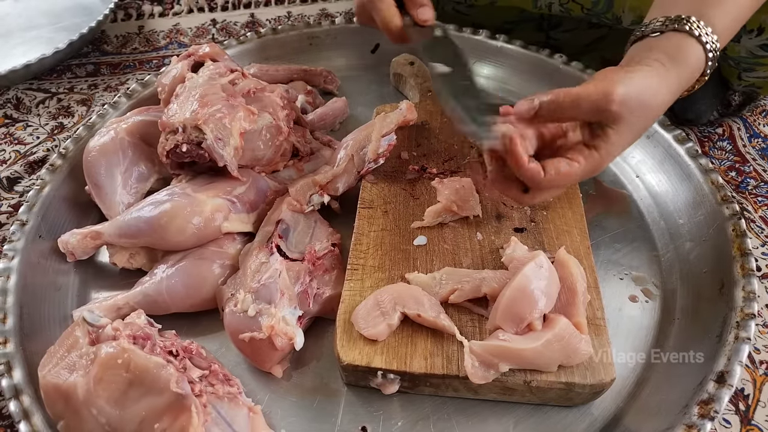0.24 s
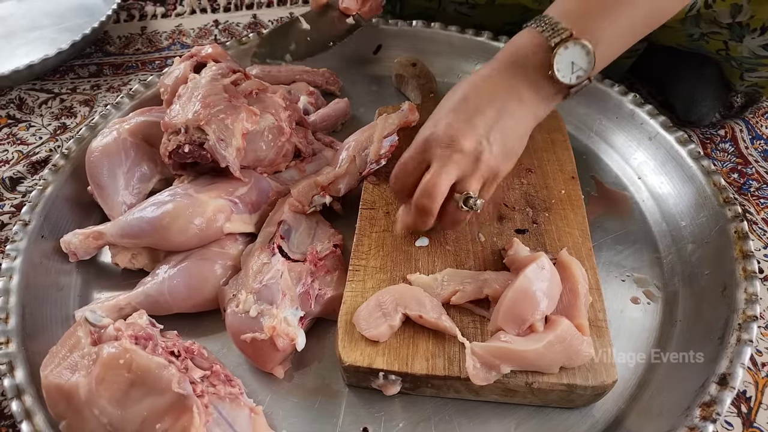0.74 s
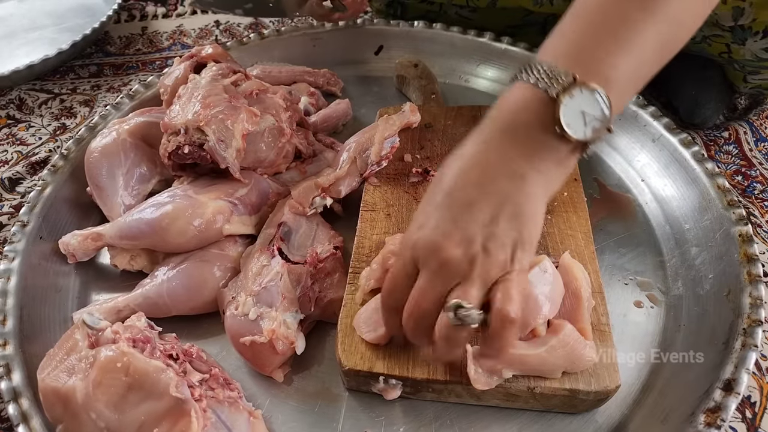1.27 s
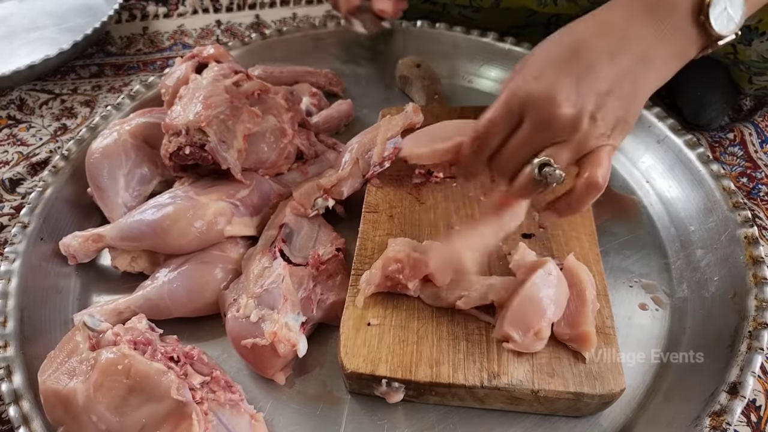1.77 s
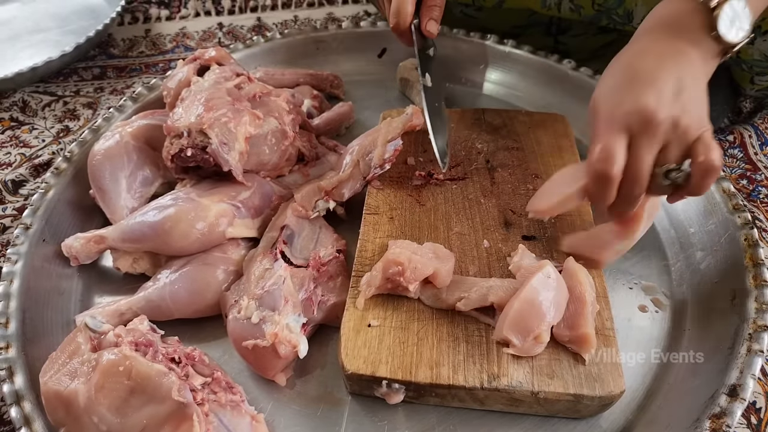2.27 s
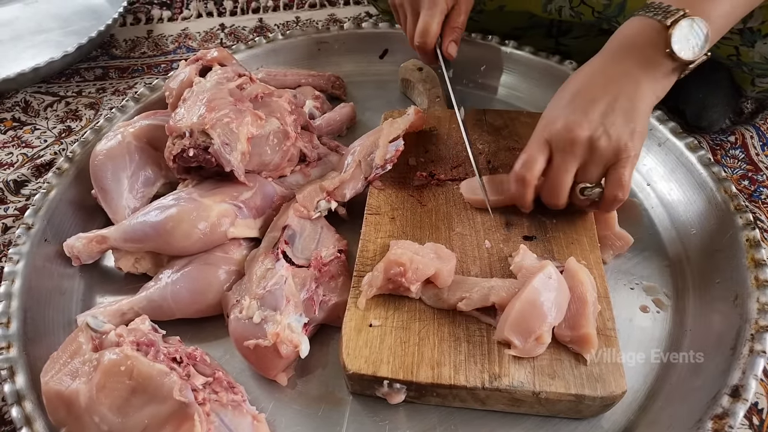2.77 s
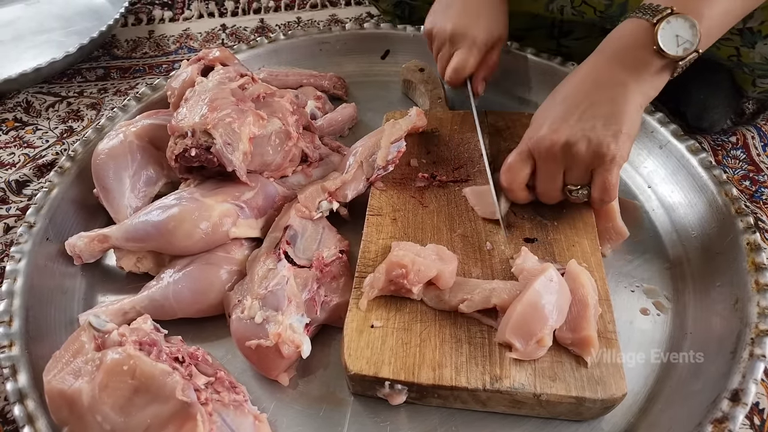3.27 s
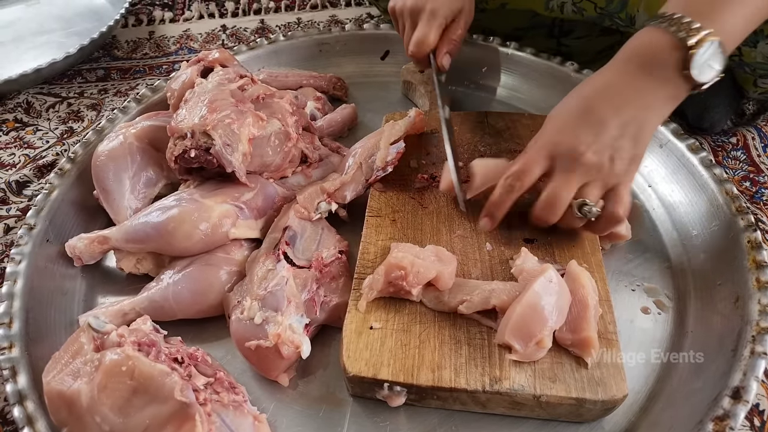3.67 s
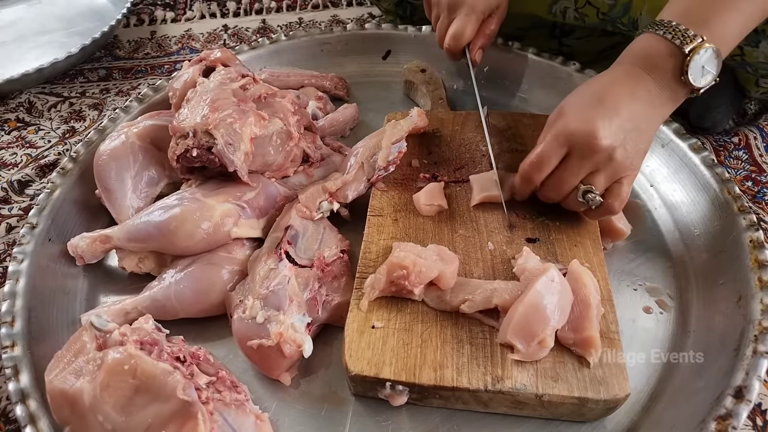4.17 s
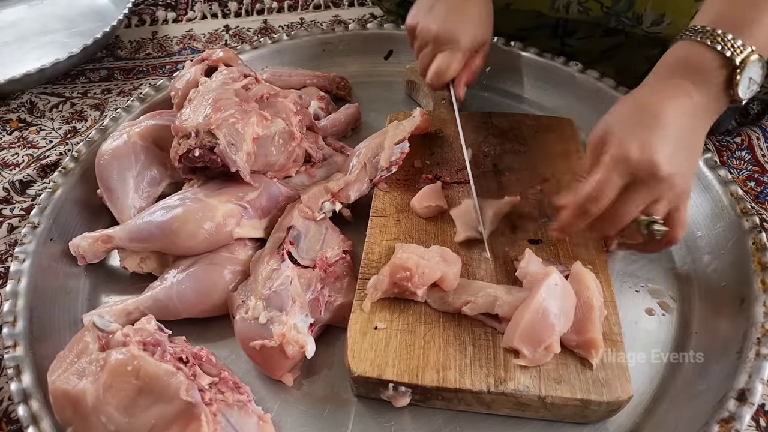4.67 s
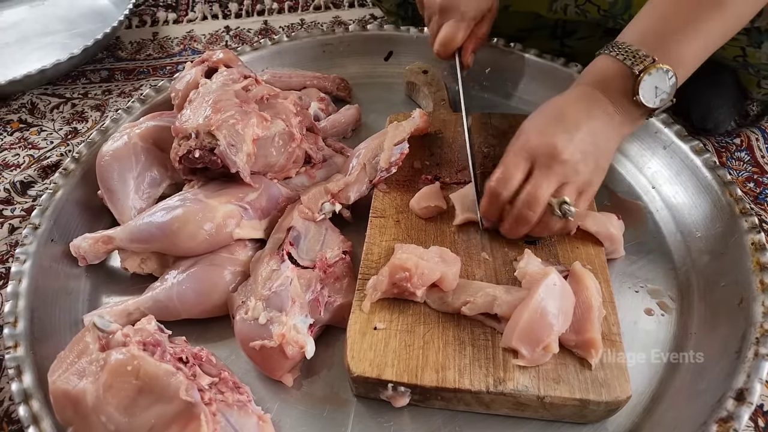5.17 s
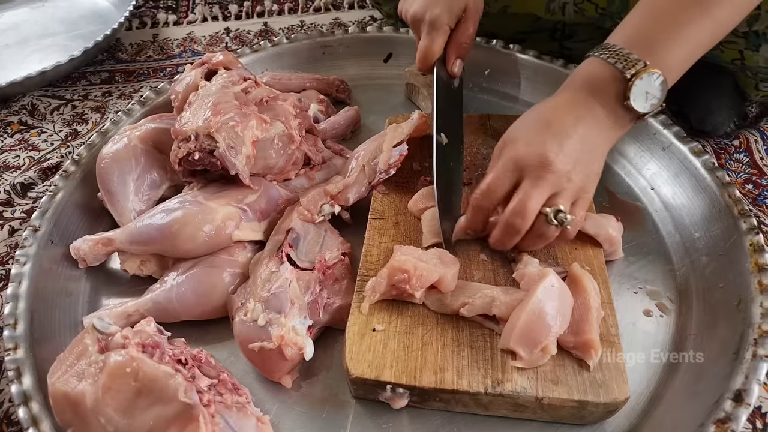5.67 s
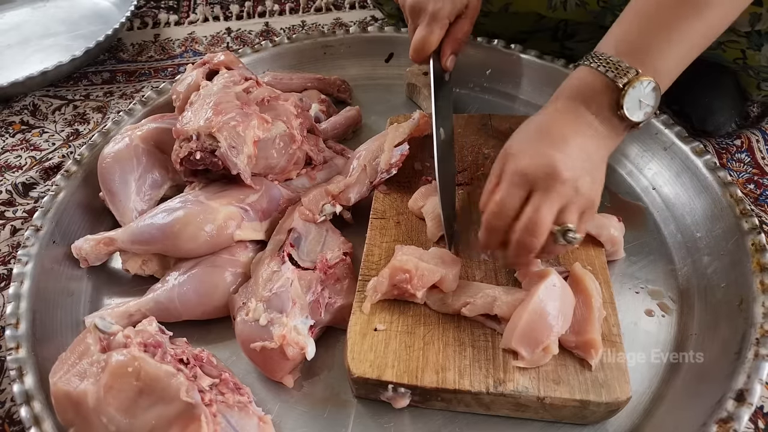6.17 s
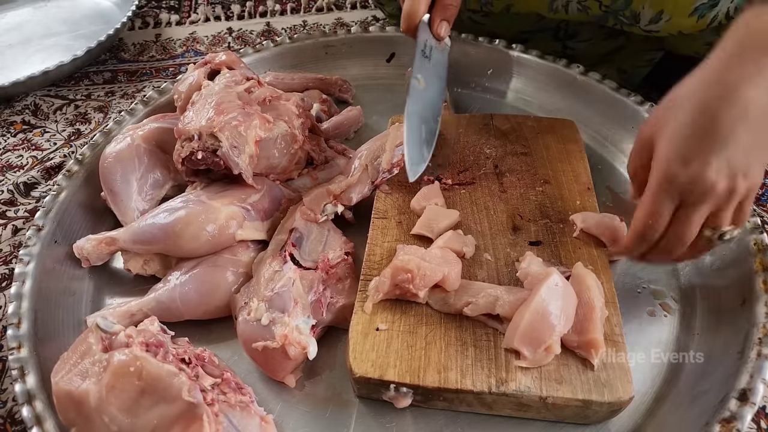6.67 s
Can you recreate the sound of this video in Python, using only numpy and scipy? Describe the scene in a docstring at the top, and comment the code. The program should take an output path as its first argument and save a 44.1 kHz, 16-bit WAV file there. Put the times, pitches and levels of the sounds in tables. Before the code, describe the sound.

Close indoor kitchen work: scratchy wet bean rubbing fades, a knife knocks dully on wood, then a hand stirs gurgling water and rubs again.

```python
"""In a small room, wet beans are rubbed by hand in a plastic colander: gritty swishes made of tiny contacts,
with sharp ticks against the wall and dull knocks on a wooden board, built from its ringing tones.
Then the hand stirs them under water, which sloshes and bubbles as many small air pockets ring.
Gliding bands of noise make the squelches, and a few last rubs follow.
Two microphone ports close by hear it all, with scattered treble, room echoes and low room noise."""
import sys
import numpy as np
from scipy import signal
from scipy.fft import rfft, irfft, next_fast_len
from scipy.io import wavfile
from scipy.ndimage import map_coordinates

SR = 44100
rng = np.random.default_rng(int(sys.argv[2]) if len(sys.argv) > 2 else 0)


def digitize_waveform(pressure):
    """Quantize a signal to 16-bit integers and store it at the path in sys.argv[1].

    Rows of a 2-D input are taken as channels; values are limited to [-1, 1].
    """
    field = np.atleast_2d(pressure).T
    bounded = np.clip(field, -1, 1)
    quanta = np.round(bounded * 32767).astype(np.int16)
    wavfile.write(sys.argv[1], SR, quanta)


N = 306054


def amp(db):
    """Turn decibels into gain."""
    return 10 ** (np.asarray(db) / 20)


def unit(x):
    """Scale a sound to an rms level of 1."""
    return x / np.sqrt(np.mean(x ** 2) + 1e-20)


def along(points, hz):
    """Read a curve of (frequency, value) points, spaced evenly by pitch."""
    f, v = np.transpose(points)
    return np.interp(np.log(hz + 1), np.log(f), v)


def wobble(rate):
    """Make a smooth random curve with this many knots a second."""
    knots = rng.standard_normal(int(N * rate / SR) + 4)
    return map_coordinates(knots, [np.arange(N) * rate / SR])


def filtered(x, response):
    """Multiply each frequency of a sound by a response, which may also shift its phase."""
    size = next_fast_len(N + SR // 2)
    hz = np.fft.rfftfreq(size, 1 / SR)
    return irfft(rfft(x, size) * response(hz), size)[..., :N]


def coloured(x, spectrum):
    """Give a sound a tone colour, then scale it to an rms level of 1."""
    return unit(filtered(x, lambda hz: amp(along(spectrum, hz))))


def add(track, s, sound):
    """Mix a sound into a track at time s."""
    part = track[max(0, round(s * SR)):][:len(sound)]
    part += sound[:len(part)]


def grit(rate, spread_db, clump_db, clump_rate):
    """Make random tiny contacts, rate a second, of uneven size; they grow and shrink in clumps."""
    contacts = (rng.random(N) < rate / SR) * rng.choice([-1, 1], N)
    size_db = spread_db * np.clip(rng.standard_normal(N), -2, 2)
    return contacts * amp(size_db + clump_db * np.tanh(wobble(clump_rate)))


def bubble(hz, cycles, rise):
    """A pocket of air rings, fading over some cycles while its pitch rises."""
    age = np.arange(int(5 * cycles / hz * SR)) * hz / SR / cycles  # 1 = one fading time
    tone = np.sin(2 * np.pi * cycles * (age + rise * age ** 2 / 2))
    return tone * np.exp(-age) * (1 - np.exp(-4 * age)) * 1.77


def swarm(rate, low_hz, high_hz, cycles, spread_db):
    """Many air pockets ring at random times, pitches and strengths, rate a second."""
    out = np.zeros(N)
    for when, size, strength, rise in rng.random((int(rate * N / SR), 4)):
        hz = low_hz * (high_hz / low_hz) ** size
        add(out, when * N / SR, amp(spread_db * strength) * bubble(hz, cycles, 0.069 * rise))
    return out


SWELL_DB = 21.5  # drop from the peak, one rise before it or one fall after it
RISE_CURVE, FALL_CURVE = 1.78, 1.07  # higher is rounder near the peak


def swell(peak_s, rise_s, fall_s):
    """Gain of one movement of the hand: it gathers speed, peaks and dies away."""
    t = np.arange(N) / SR - peak_s
    near = (t > -3 * rise_s) & (t < 3 * fall_s)
    out, t = np.zeros(N), t[near]
    rise, fall = np.abs(t / rise_s) ** RISE_CURVE, np.abs(t / fall_s) ** FALL_CURVE
    out[near] = amp(-SWELL_DB * np.where(t < 0, rise, fall))
    return out


def movements(rows):
    """Make one gain curve for each level column; movements that overlap add in power."""
    powers = (np.outer(amp(levels), swell(s, rise_s, fall_s)) ** 2 for s, rise_s, fall_s, *levels in rows)
    return np.sqrt(sum(powers))


# rubbing strokes: (time of most speed [s], rise [s], fall [s], colander wall level [dB], wet hiss level [dB])
RUBBING_STROKES = [(0.0, .15, 0.18, -37.5, -32.5), (0.07, 0.044, 0.11, -36.5, -39.5),
                   (0.235, 0.15, 0.31, -30.5, -40.5), (0.6, 0.32, 0.66, -57, -37),
                   (0.65, 0.15, 0.18, -39.5, -46), (0.795, 0.16, 0.15, -35.5, -38.5),
                   (1.0, 0.064, 0.094, -41, -54), (1.12, 0.19, 0.3, -40.5, -45.5),
                   (1.25, 0.15, 0.19, -45, -68), (1.335, .09, 0.16, -43.5, -42.5),
                   (1.5, 0.11, 0.082, -50.5, -48.5), (1.675, 0.02, 0.067, -73, -41),
                   (1.755, 0.078, 0.077, -43.5, -50.5), (1.93, 0.093, .12, -57.5, -51),
                   (2.111, .006, 0.1, -43, -51.5), (2.21, 0.078, 0.06, -39, -44.5),
                   (2.31, 0.069, 0.13, -50, -68), (2.56, 0.12, 0.23, -51.5, -55.5),
                   (2.658, .012, 0.078, -36, -52), (2.78, 0.16, .11, -46, -67),
                   (3.02, 0.12, 0.18, -53, -54.5), (3.145, 0.026, .06, -42, -46),
                   (3.185, 0.026, 0.078, -43, -65), (3.36, 0.087, .12, -55.5, -58.5),
                   (3.575, 0.093, 0.04, -50, -56), (3.65, 0.11, 0.064, -58.5, -55.5),
                   (3.8, 0.33, 0.32, -61, -80), (4.08, 0.044, 0.061, -44.5, -56),
                   (4.131, 0.011, 0.019, -42, -54), (4.225, 0.0037, 0.05, -39.5, -55),
                   (4.258, 0.029, 0.026, -35, -49), (4.48, 0.11, 0.22, -72, -61.5),
                   (6.615, 0.018, 0.097, -40.5, -34.5), (6.722, 0.032, 0.028, -37, -32.5),
                   (6.86, 0.023, .06, -53, -59), (6.927, 0.021, .05, -40.5, -44)]
# the hand leans on the heap:
# (time of most weight [s], rise [s], fall [s], rumble level [dB], shifting beans level [dB])
HEAP_PRESSES = [(0.07, 0.12, .15, -58.5, -58), (0.28, 0.22, 0.21, -54, -45), (0.67, 0.11, 0.17, -47.5, -55),
                (0.82, 0.11, 0.2, -56, -54.5), (1.045, 0.091, 0.18, -56.5, -53),
                (1.33, 0.33, .17, -48, -58), (1.77, 0.099, 0.076, -66, -58.5),
                (2.225, 0.043, 0.13, -63, -54.5), (2.77, 0.28, .1, -61, -60),
                (3.185, 0.019, 0.08, -80, -54), (3.37, 0.14, 0.57, -60, -72), (3.9, 0.074, 0.13, -59, -67),
                (4.45, 0.27, 0.19, -70, -77.5), (6.71, 0.059, 0.078, -51, -74),
                (6.85, 0.042, 0.09, -52, -51), (6.94, .04, .1, -52, -55)]
# tone colour of the colander's main resonance: (frequency [Hz], level [dB])
RING_COLOUR = [(700, -28.5), (1400, -17), (1750, -4.5), (2150, -3), (2430, 3), (2750, -8.5), (3300, -14),
               (9000, -42)]
# tone colour of its whole wall: (frequency [Hz], level [dB])
WALL_COLOUR = [(300, -33), (850, -17), (1100, -3), (1800, -2), (2150, -6), (2480, 2), (3300, -8.5),
               (4300, -7), (7000, -14), (14000, -19)]
# tone colour of the wet hiss: (frequency [Hz], level [dB])
HISS_COLOUR = [(1500, -15.5), (3200, -1.5), (4300, 0.5), (6000, 0), (7400, -1), (8700, 0), (9900, -5.5),
               (12300, 5), (16000, -5.5)]
# tone colour of the shifting heap: (frequency [Hz], level [dB])
HEAP_COLOUR = [(100, -22), (250, 0.5), (450, 2), (780, 8), (1100, -8), (2000, -32)]
# tone colour of the low rumble, also used under water: (frequency [Hz], level [dB])
RUMBLE_COLOUR = [(25, -20), (42, -8), (52, -6), (62, 4), (75, -0.5), (95, -8.5), (128, -0.5), (200, -8.5),
                 (400, -16), (900, -57)]


def rubbing(firm_db=-45):
    """Light strokes mostly ring the main resonance, firm ones the whole wall; the pressed heap rumbles."""
    wall, hiss = movements(RUBBING_STROKES)
    rumble, heap = movements(HEAP_PRESSES)
    firm = wall / (wall + amp(firm_db))  # 0 = light, 1 = firm
    ring = coloured(grit(rate=2500, spread_db=2.5, clump_db=5, clump_rate=80), RING_COLOUR)
    rasp = coloured(grit(rate=4500, spread_db=3.5, clump_db=2.0, clump_rate=78), WALL_COLOUR)
    scrape = amp(1.0) * wall * (np.sqrt(1 - firm) * ring + np.sqrt(firm) * rasp)
    wet_grit = grit(rate=9200, spread_db=5.0, clump_db=1.0, clump_rate=120)
    wet = amp(-0.5) * hiss * coloured(wet_grit, HISS_COLOUR)
    bursts = swarm(rate=750, low_hz=2960, high_hz=14500, cycles=2.3, spread_db=14)
    film = amp(-12.0) * hiss * coloured(bursts, HISS_COLOUR)  # the water film bursts
    heap_grit = grit(rate=1600, spread_db=6.5, clump_db=4.5, clump_rate=34)
    shift = amp(4) * heap * coloured(heap_grit, HEAP_COLOUR)
    thud = amp(-0.5) * rumble * coloured(rng.standard_normal(N), RUMBLE_COLOUR)
    return scrape + wet + film + shift + thud


# tone colour of a bean's snap, also used for the ticks: (frequency [Hz], level [dB])
TICK_COLOUR = [(200, -25), (900, -12), (1700, -0.5), (2450, 0.5), (3200, -8.5), (4200, -0.5), (7000, -2),
               (10000, -7.5), (12500, 4), (16000, -14)]


def settling(db=-71):
    """Wet beans settle with faint stray crackles, made of sparse tiny contacts."""
    contacts = grit(rate=62, spread_db=8.5, clump_db=6.5, clump_rate=5.05)
    return amp(db) * coloured(contacts, TICK_COLOUR)


# air pockets squeezed between the fingers:
# (time [s], length [s], first pitch [Hz], last pitch [Hz], width [Hz], level [dB])
SQUEEZED_POCKETS = [(0.268, 0.25, 2160, 1506, 361, -42.5), (3.845, 0.17, 1430, 1510, 606, -55.5),
                    (4.117, 0.021, 1350, 1890, 382, -35.5), (4.228, 0.04, 2335, 1400, 382, -34),
                    (4.774, 0.13, 1606, 1720, 162, -60), (4.782, 0.11, 965, 840, 154, -55.5),
                    (4.785, 0.1, 456, 400, 151, -54.5), (5.134, 0.06, 1265, 705, 218, -29),
                    (5.709, 0.0477, 1583, 2023, 97, -43), (5.947, 0.055, 1296, 2580, 101, -39.5),
                    (6.146, 0.03, 1925, 1320, 98, -48.5), (6.238, 0.034, 1950, 2660, 100, -43.5),
                    (6.27, 0.062, 2600, 2430, 246, -50), (6.336, 0.08, 893, 1500, 80, -42.5),
                    (6.369, 0.024, 3150, 3300, 80, -41)]


def squelches():
    """A shrinking or opening air pocket is a narrow noisy resonance that glides."""
    out = np.zeros(N)
    for s, length, first_hz, last_hz, width_hz, db in SQUEEZED_POCKETS:
        u = np.linspace(0, 1, int(length * SR))  # from start to end of the squelch
        phase = 2 * np.pi * np.cumsum(first_hz * (last_hz / first_hz) ** u) / SR
        knots = np.arange(len(u)) * 1.7 * width_hz / SR  # faster flutter makes a wider band
        a, b = (map_coordinates(k, [knots], mode="mirror") for k in rng.standard_normal((2, 200)))
        noise = unit(a * np.sin(phase) + b * np.cos(phase))
        add(out, s, amp(db - 3) * np.sin(np.pi * u) * noise)
    return out


# beans tick on the wall: (time [s], level [dB], change of the top treble [dB])
WALL_TICKS = [(0.6647, -14.5, -12), (1.5774, -38, 8), (1.612, -40.5, 20), (2.108, -34.5, 9),
              (1.346, -24, 17), (2.2197, -23, -49), (2.6439, -18.5, -33), (2.6574, -22, -5),
              (3.1775, -18, -23), (4.119, -23, -21), (4.264, -33, -18), (4.3864, -43.5, 22),
              (4.5032, -31.5, 39), (5.383, -21, -1), (5.3932, -20.5, 6), (5.456, -15.5, -20),
              (5.5452, -21, -4.5), (5.619, -19.5, 11), (5.7089, -22.5, -22), (5.7906, -22.5, -7),
              (5.89, -21, 0), (5.9524, -23, -25), (5.983, -19, -6), (6.2385, -33, 25), (6.382, -25.5, 14),
              (6.4, -27.5, -5), (6.7277, -19.5, -23.5), (6.7893, -27, -5), (6.865, -27, -22),
              (6.925, -27.5, -12)]


def ticks(ring_s=0.00079, rattle_s=0.019, rattle_db=-20, bright_hz=6500, ripple_db=3.0, first_contact=7):
    """A bean snaps against the wall, each with its own colour, and its neighbours rattle briefly."""
    out, t = np.zeros(N), np.arange(2048) / SR
    hz = np.fft.rfftfreq(len(t), 1 / SR)
    for s, db, treble_db in WALL_TICKS:
        fading = np.exp(-t / ring_s) + amp(rattle_db) * np.exp(-t / rattle_s)
        burst = rng.choice([-1, 1], len(t)) * fading
        burst[0] = first_contact  # one clean push leads the rattle
        ripple = np.interp(hz, np.linspace(0, SR / 2, 20), rng.standard_normal(20)) * hz / (hz + 3000)
        treble = treble_db * hz ** 4 / (hz ** 4 + bright_hz ** 4)
        colour_db = along(TICK_COLOUR, hz) + ripple_db * ripple + treble
        # fold the colour's phase so that nothing sounds before the contact
        cepstrum = irfft(np.log(amp(colour_db)))
        causal = np.exp(rfft(cepstrum * 2 * (t < t[-1] / 2)))
        snap = irfft(rfft(burst) * causal)
        add(out, s, amp(db + 4.5) * snap / np.abs(snap).max())
    return out


# knocks on the board: (time [s], level [dB], centre of the first blow [Hz])
BOARD_KNOCKS = [(0.668, -37, 164), (1.333, -17, 492), (2.61, -28.5, 940), (3.179, -44.5, 314),
                (3.335, -27.5, 258), (3.41, -49, 270), (4.914, -33, 354), (5.427, -24, 483),
                (5.513, -26.5, 517), (6.675, -51, 170), (6.715, -52, 170), (6.811, -15, 930),
                (6.832, -32, 190)]
# ringing tones (modes) of the board: (frequency [Hz], level [dB], time to fade by 60 dB [s])
BOARD_MODES = [(124, -13, 0.21), (220.5, -2.5, 0.15), (287, 0.5, 0.081), (398, 5, 0.035), (563, 3, 0.032),
               (748, 7, 0.023), (978, 5.5, 0.065), (1127, 4, 0.029), (1298, 8.5, 0.02), (1670, 3, 0.033),
               (2005, 3, 0.033)]
# each further contact comes after this gap, loses this level and has its centre pitch multiplied
BOUNCE_S, BOUNCE_LOSS_DB, BOUNCE_DULLS = .012, 12.5, 0.5


def knocks(octaves=1.24, crack_db=-22, count=3):
    """Soft blows wake the board's low modes, hard ones its high modes and a crack; bounces get weaker, duller."""
    out, t = np.zeros(N), np.arange(SR // 4) / SR
    contacts = [(s + k * BOUNCE_S, db - k * BOUNCE_LOSS_DB, hz * BOUNCE_DULLS ** k)
                for s, db, hz in BOARD_KNOCKS for k in range(count)]
    for s, db, centre_hz in contacts:
        ring = np.zeros(len(t))
        for k, (hz, level, t60) in enumerate(BOARD_MODES):
            fading = amp(level + rng.normal(0, 0.69) - 60 * t / t60)
            reach = 1 / (1 + (np.log2(hz / centre_hz) / octaves) ** 4)  # modes near the centre ring most
            ring += fading * (-1) ** k * np.sin(2 * np.pi * hz * t) * reach
        crack = amp(crack_db - 60 * t / 0.2) * (centre_hz / 900) ** 2 * rng.standard_normal(len(t))
        add(out, s, amp(db) * (ring / np.abs(ring).max() + crack))
    return out


# single bubbles: (time [s], level [dB], starting pitch [Hz])
SINGLE_BUBBLES = [(2.038, -40.5, 1200), (3.3, -42, 1210), (3.365, -42, 1290), (3.703, -42, 1750),
                  (3.775, -41.5, 930), (3.791, -39.5, 1650), (3.812, -46, 1930), (5.001, -25, 2860),
                  (5.026, -25.5, 1810), (5.072, -25, 2575), (5.226, -22.5, 1686), (5.271, -26, 2570),
                  (5.311, -28, 418), (5.354, -24.5, 1225), (5.461, -19, 1750), (5.568, -27, 573),
                  (5.598, -24.5, 1580), (5.618, -21.5, 1770), (5.675, -31.5, 740), (5.741, -24, 1890),
                  (5.793, -23.5, 1970), (5.831, -22.5, 1180), (5.888, -23.5, 1467), (6.029, -26, 1755),
                  (6.062, -30, 2500), (6.084, -31, 2680), (6.1, -31, 3300), (6.239, -27, 2034),
                  (6.44, -31, 2314), (6.551, -29.5, 1620)]


def plops(snap_db=-11, snap_s=0.0029):
    """The clearest bubbles ring; each is born with a wet snap, stronger for a higher pitch."""
    out, t = np.zeros(N), np.arange(SR // 20) / SR
    for s, db, hz in SINGLE_BUBBLES:
        add(out, s, amp(db - 3.5) * bubble(hz, cycles=0.0028 * hz + 2.5, rise=0.01))
        snap = np.exp(-t / snap_s) * rng.standard_normal(len(t))
        add(out, s, amp(db + snap_db) * hz / 2000 * snap)
    return out


# vigour of the stirring under water: (time [s], level [dB])
STIR_VIGOUR = [(4.86, -84), (4.966, -45), (5.086, -42.5), (5.13, -47), (5.204, -37), (5.392, -43.5),
               (5.776, -37.5), (6.018, -42), (6.226, -46.5), (6.458, -53.5), (6.6, -45)]
# water falls back into the hollow behind the hand: (time [s], level [dB])
WATER_GULPS = [(4.921, -48.5), (4.97, -45), (5.228, -36), (5.28, -43), (5.345, -42.5), (5.44, -41),
               (5.519, -34), (5.622, -39.5), (5.96, -54), (6.13, -46.5), (6.243, -46)]
LARGE_GROWS, SMALL_GROWS, SPRAY_GROWS = 2.86, 0.99, 0.68  # dB gained per dB of vigour
LARGE_DB, SMALL_DB, SPRAY_DB = -41, -39, -42  # base gains, where vigour is 0 dB
GULP_RISE_S, GULP_FALL_S = 0.03, 0.073
GULP_SMALL_DB, GULP_SPRAY_DB = -10.5, -4.5  # compared with the large bubbles of a gulp


def stirring(churn_db=3.0, churn_rate=32):
    """Large bubbles, small bubbles and spray grow with the vigour, churn unevenly and leap at each gulp."""
    s, db = np.transpose(STIR_VIGOUR)
    vigour_db = np.interp(np.arange(N) / SR, s, db - db.max(), -120, -120)  # still before and after
    vigour_db = vigour_db + churn_db * (np.tanh(wobble(churn_rate)) - .5)
    gulps, = movements([(when, GULP_RISE_S, GULP_FALL_S, level) for when, level in WATER_GULPS])
    large = np.hypot(amp(LARGE_DB + LARGE_GROWS * vigour_db), gulps)
    small = np.hypot(amp(SMALL_DB + SMALL_GROWS * vigour_db), amp(GULP_SMALL_DB) * gulps)
    spray = np.hypot(amp(SPRAY_DB + SPRAY_GROWS * vigour_db), amp(GULP_SPRAY_DB) * gulps)
    return large, small, spray


# resonances of the bowl of water: (frequency [Hz], width [Hz], level [dB])
BOWL_RESONANCES = [(205, 230, -14.5), (414, 91, -7), (607, 86, 2.5), (790, 190, 2.5), (1140, 224, 5),
                   (1700, 113, 7), (2450, 1100, 2.5)]


def bowl(hz):
    """The bowl of water strengthens sound near each of its resonances; neighbours push in opposite ways."""
    return sum((-1) ** k * amp(db) * 1j * hz * width / (centre ** 2 - hz * hz + 1j * hz * width)
               for k, (centre, width, db) in enumerate(BOWL_RESONANCES))


# tone colour of the spray: (frequency [Hz], level [dB])
SPRAY_COLOUR = [(1800, 8.5), (3300, 2), (4400, 2.5), (6500, -3.5), (8600, -1), (9900, -6.5), (12300, 1.5),
                (16000, -6.5)]


def sloshing():
    """Stirred water traps bubbles that sound through the bowl, and throws a crackling spray."""
    large, small, spray = stirring()
    large_pockets = swarm(rate=450, low_hz=238, high_hz=1550, cycles=1.5, spread_db=17)
    gurgle = unit(filtered(large_pockets, bowl))
    small_pockets = swarm(rate=700, low_hz=1100, high_hz=3400, cycles=5.5, spread_db=24)
    babble = unit(filtered(small_pockets, bowl))
    crackle = coloured(grit(rate=9000, spread_db=4.5, clump_db=4, clump_rate=140), SPRAY_COLOUR)
    droplets = swarm(rate=900, low_hz=3000, high_hz=15500, cycles=5, spread_db=26)
    fizz = coloured(np.diff(droplets, prepend=0), SPRAY_COLOUR)  # the difference favours treble
    surge = coloured(rng.standard_normal(N), RUMBLE_COLOUR)
    deep = large * (amp(3.0) * gurgle + amp(-17) * surge)
    return deep + amp(-1.5) * small * babble + spray * (amp(-7) * crackle + amp(-2.0) * fizz)


# how long the room echoes: (frequency [Hz], time to fade by 60 dB [s])
ROOM_FADE = [(200, 0.58), (700, 0.23), (4000, 0.27), (15000, 0.17)]


def room(x):
    """The walls answer each port differently, a few milliseconds later; the bass lasts longest."""
    hz, t, z = signal.stft(rng.standard_normal((2, SR // 2)), SR, nperseg=256)
    fading = amp(-60 * t / along(ROOM_FADE, hz)[:, None])
    tail = signal.istft(z * fading, SR, nperseg=256)[1]
    tail = np.pad(tail / np.linalg.norm(tail[0]), ((0, 0), (130, 0)))  # wait 130 samples
    return signal.fftconvolve(x[None], tail, axes=1)[:, :N]


def near_echoes(x, t60=0.0066, low_hz=2000, size=128):
    """The bowl and the moving hands scatter the treble, with unrelated phases at the two ports."""
    hz, t, z = signal.stft(x, SR, nperseg=size)
    keep = amp(-60 * t[1] / t60) ** 2  # share of energy left after one step
    energy = signal.lfilter([1 - keep], [1, -keep], np.abs(z) ** 2)
    phases = np.exp(2j * np.pi * rng.random((2, *z.shape)))
    echoes = signal.istft(np.sqrt(2 * energy) * phases, SR, nperseg=size)[1]
    late = np.pad(echoes, ((0, 0), (size // 2, 0)))[:, :N]
    return filtered(late, lambda hz: hz ** 2 / (hz ** 2 + low_hz ** 2))


# tone colour of the room noise: (frequency [Hz], level [dB])
FLOOR_COLOUR = [(25, -27), (42, 4), (52, -9), (64, 6), (95, -8.5), (130, 0.5), (180, -4.5), (280, -7),
                (700, -25.5), (2300, -27.5), (4000, -26), (16000, -35)]
# left minus right: (frequency [Hz], level difference [dB])
LEFT_RIGHT_BALANCE = [(60, 0.5), (200, 4.5), (700, 3.5), (1300, 7.5), (2400, 5), (4400, 2), (8100, 7),
                      (15000, 1)]
PORT_LAG_S = .000455  # direct sound reaches the right port this much later


def scene():
    """All the work happens a little to the left, over the quiet low noise of the room."""
    work = rubbing() + sloshing() + plops() + squelches() + ticks() + settling() + knocks()
    shared_noise = amp(-66.0) * coloured(rng.standard_normal(N), FLOOR_COLOUR)
    two_noises = coloured(rng.standard_normal((2, N)), FLOOR_COLOUR)
    air = amp(-64) * filtered(two_noises, lambda hz: hz / (hz + 300))
    sides = np.array([[1], [-1]])  # left early, right late
    direct = filtered(work, lambda hz: np.exp(1j * np.pi * hz * PORT_LAG_S * sides))
    walls = filtered(room(work), lambda hz: hz / (hz + 200))
    pair = direct + near_echoes(work) + amp(-7.0) * walls + shared_noise + air
    return filtered(pair, lambda hz: amp(along(LEFT_RIGHT_BALANCE, hz) * sides / 2))


TOP_HZ = 16200  # band limit


def record(dry):
    """A very steep filter removes nearly everything above the band limit."""
    return filtered(dry, lambda hz: 1 / (1 + (hz / TOP_HZ) ** 160))


dry = scene()
out = record(dry)
digitize_waveform(out)
```